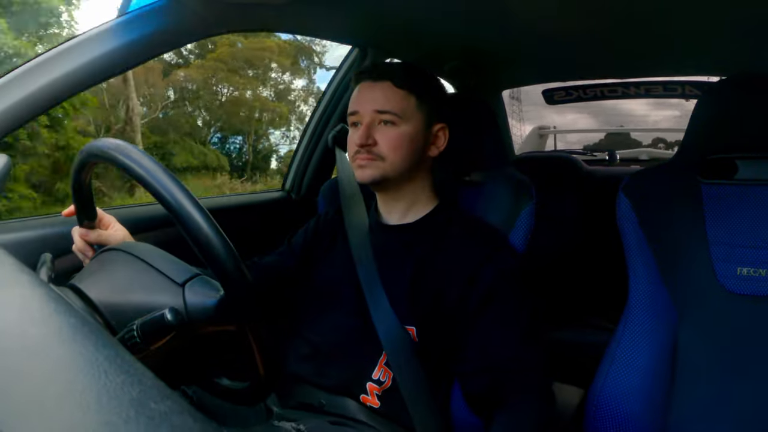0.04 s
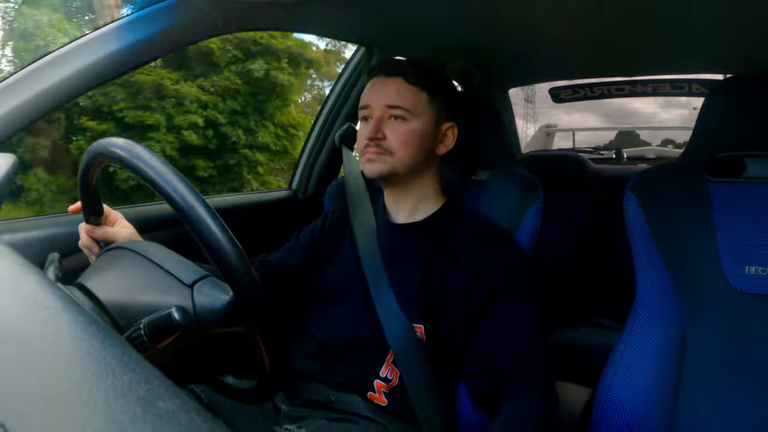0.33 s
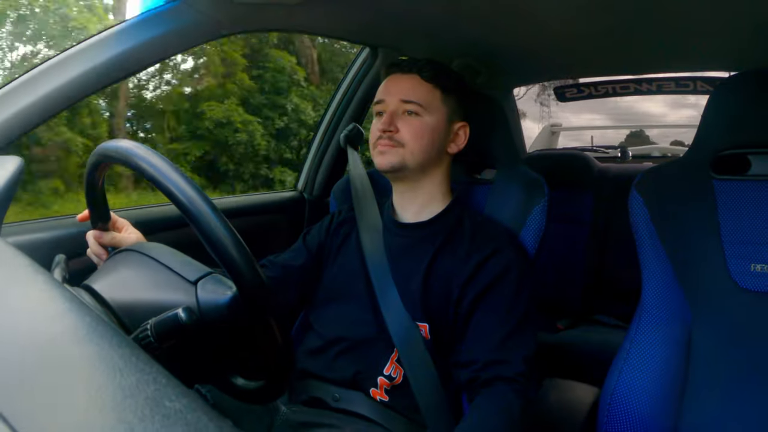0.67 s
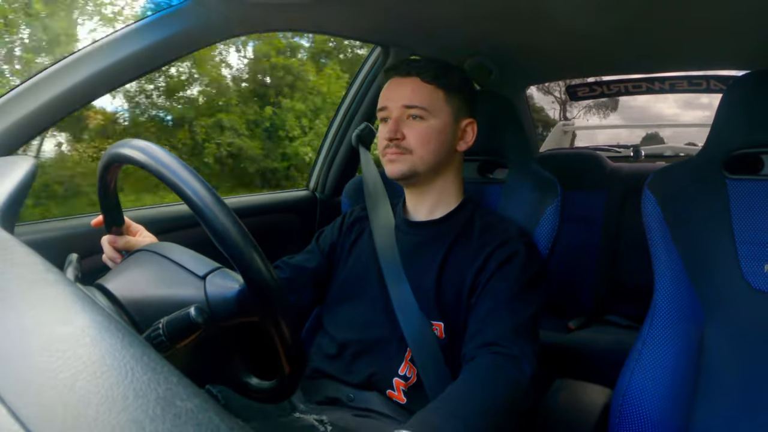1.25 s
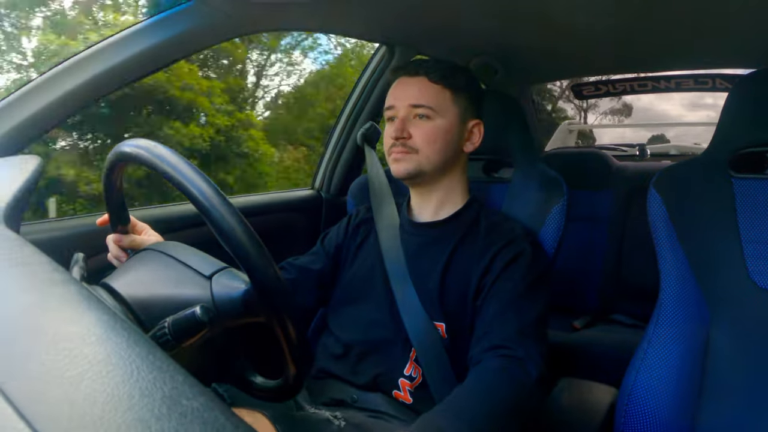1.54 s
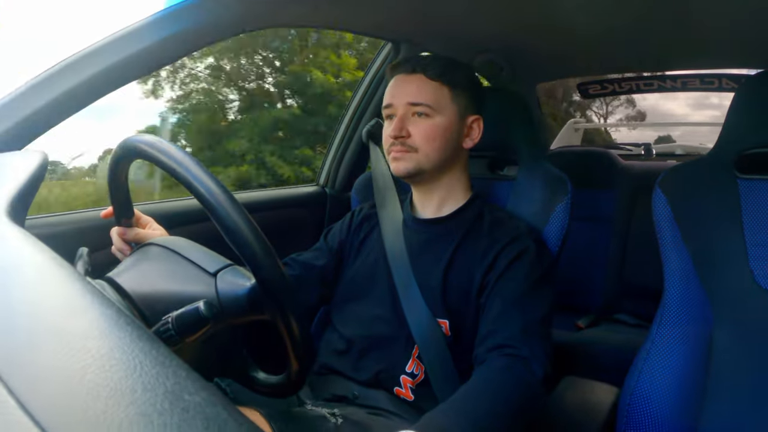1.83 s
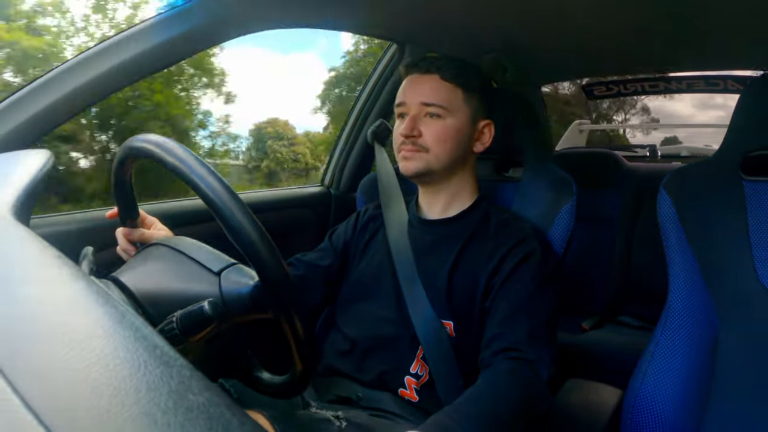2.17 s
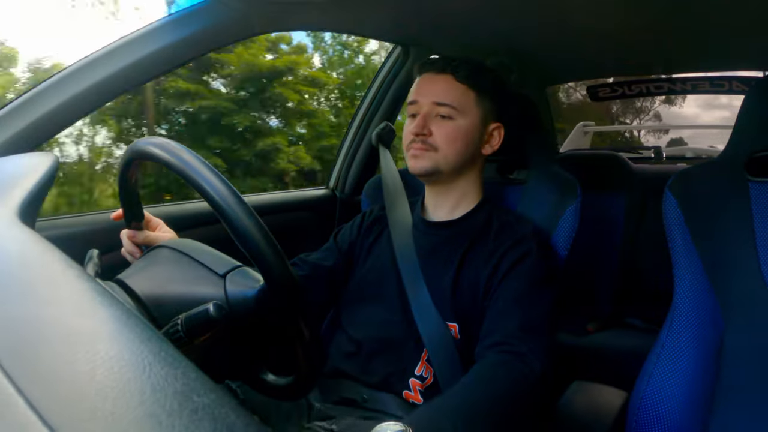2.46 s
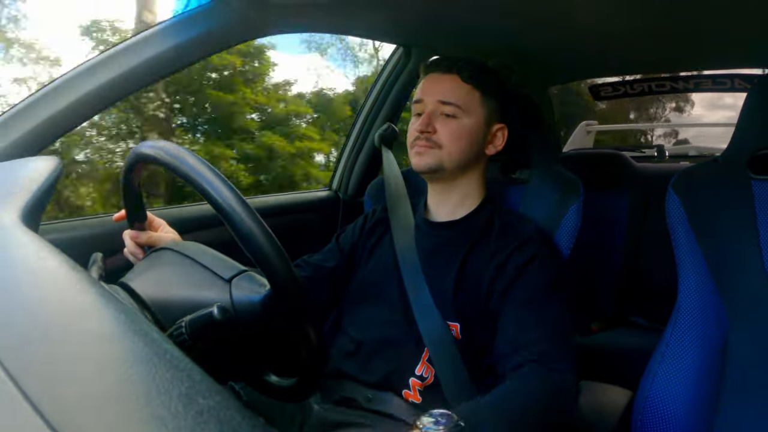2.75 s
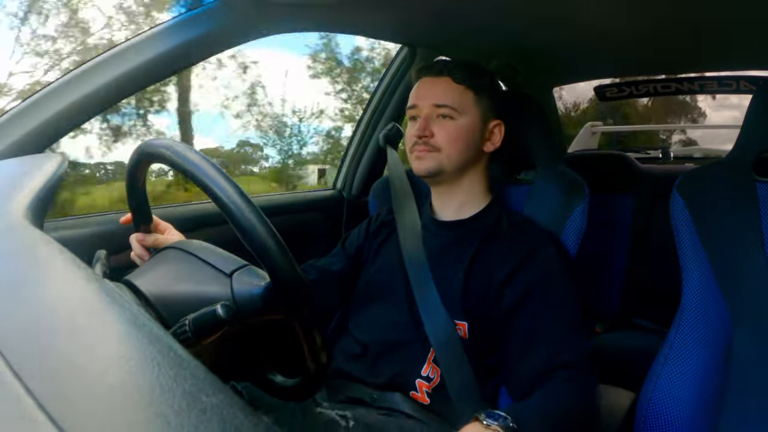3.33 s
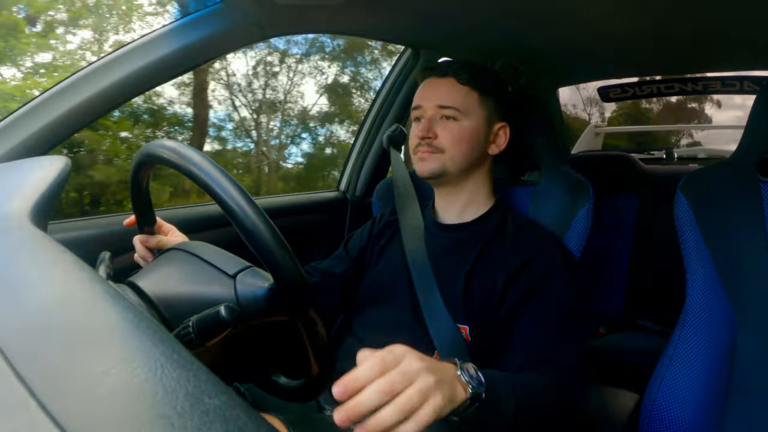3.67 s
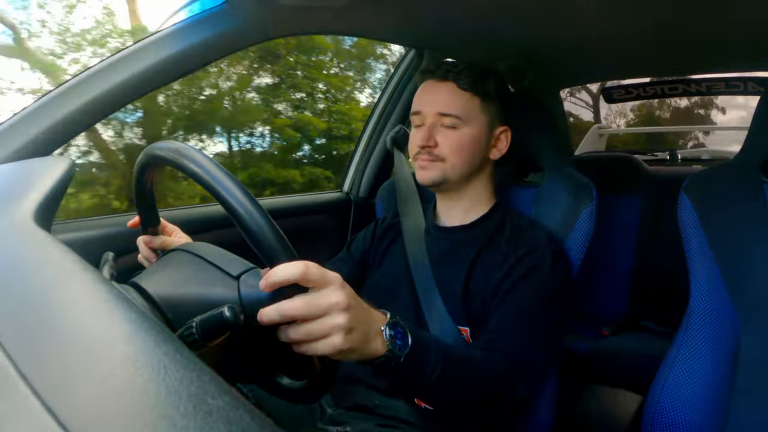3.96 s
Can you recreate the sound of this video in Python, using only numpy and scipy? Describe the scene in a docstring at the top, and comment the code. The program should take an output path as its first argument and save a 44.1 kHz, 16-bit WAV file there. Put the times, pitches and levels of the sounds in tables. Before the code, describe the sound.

Turbocharged car engine heard from inside, accelerating and twice letting out fluttering, whistling chuffs.

```python
"""A deep exhaust boom over road rumble: inside a turbocharged four-cylinder car that is speeding up.
The boom follows the firing of the cylinders, and the air intake hisses in time with them as the turbo
builds pressure. Twice the driver lifts off the throttle and the turbo's compressor surges (air flows
backwards through it): the intake pipe honks, then the air flutters out in quickening, whistling chuffs."""
import sys
import numpy as np
from scipy import signal
from scipy.fft import rfft, irfft, next_fast_len
from scipy.io import wavfile
from scipy.ndimage import uniform_filter1d, minimum_filter1d, map_coordinates

SR = 44100
rng = np.random.default_rng(int(sys.argv[2]) if len(sys.argv) > 2 else 0)


def wrap_up_sound(samples):
    """Save the sound to the file named by the first command line argument, as 16-bit audio."""
    columns = np.atleast_2d(samples).T
    # keep every value between -1 and 1, then stretch to whole-number steps
    tamed = np.clip(columns, -1, 1)
    steps = np.round(tamed * 32767).astype(np.int16)
    wavfile.write(sys.argv[1], SR, steps)


N = 176400  # 4 seconds

# Fixed pitches at which the cabin colours the hiss and chuffs: pitch_hz, width_hz, lift_db
CABIN_RESONANCES = [(1515, 34, 12.5), (1929, 61, 9), (2216, 180, 5.5), (2760, 110, 5), (3414, 120, 4.5),
                    (3910, 130, 4.5), (5070, 170, 4.5), (5970, 250, 4), (7890, 610, 5), (9970, 680, 2)]
# Puffs of escaping air: middle_s, length_s, level_db, whistle_hz, whistle_db, octave_db
CHUFFS = [(0.477, 0.034, -37, 7900, -62, -65), (0.55, 0.09, -36, 7750, -47, -48),
          (0.657, 0.058, -36, 7100, -43, -45), (0.739, .056, -36, 6340, -44, -47),
          (0.823, 0.047, -37.5, 5850, -41, -45), (0.903, .046, -36, 6000, -45, -56),
          (.976, 0.042, -37.5, 5700, -50, -56), (1.048, 0.037, -38, 5500, -52, -57),
          (1.12, 0.018, -37.5, 5300, -52, -60), (2.588, 0.076, -40, 8000, -50, -38),
          (2.69, 0.089, -37, 7520, -62, -50), (2.791, 0.07, -36, 7150, -42, -44),
          (2.883, 0.057, -36.5, 6530, -53, -41), (2.968, .052, -37, 5950, -46, -45),
          (3.052, 0.046, -37, 6097, -49, -50), (3.127, 0.043, -38, 5890, -50, -51),
          (3.199, 0.029, -37, 5410, -47, -60)]
CHUFF_EDGE_S = .018
# The honk's tone colour (how strong each pitch is): pitch_hz, level_db
HONK_COLOUR = [(600, -3), (1080, -18.5), (1200, 5), (1300, 7), (1400, -5.5), (1520, -9), (1700, -53),
               (3000, -42)]


def exhaust(firing_hz, phase):
    """The firing cylinders make a boom and two overtones; being unequal, they also burble."""
    # Strength of the boom: time_s, level_db
    boom_levels = [(0, -15), (.34, -10), (.41, -18.5), (.47, -15.5), (.97, -14.5), (1.06, -26), (1.12, -15),
                   (1.7, -14.5), (2.3, -10), (2.5, -12), (2.525, -27), (2.58, -16), (2.72, -18), (2.8, -14),
                   (3.02, -16.5), (3.1, -23), (3.18, -18), (4, -15.5)]
    # How hard the engine works: time_s, level_db
    engine_load = [(0, -5.5), (.35, 2.5), (.46, -17.5), (1, -13), (1.22, -0.5), (2, 0.5), (2.47, -2),
                   (2.56, -29), (3.05, -15), (3.3, -3.5), (4, 1.5)]
    # Cabin resonances met by the overtone at twice the firing rate: pitch_hz, level_db
    cabin_second = [(195, -18), (204, -14.5), (211, -20.5), (220, -28.5), (229, -33.5), (245, -32),
                    (262, -30), (270, -23.5), (280, -18), (290, -30.5)]
    # The same at three times the firing rate: pitch_hz, level_db
    cabin_third = [(300, -33), (332, -33.5), (347, -25), (363, -23.5), (378, -29), (392, -42.5), (435, -35)]
    # Strength of each burble tone: pitch_hz, level_db
    burble_colour = [(30, -71), (55, -26), (78, -34), (100, -42.5), (135, -39), (170, -34), (205, -29.5),
                     (250, -45), (310, -38.5), (350, -28.5), (385, -36), (425, -35), (470, -51.5),
                     (600, -52.5), (900, -53.5)]
    load = amp(curves(engine_load)[0])
    out = amp(curves(boom_levels)[0] + .6 * wobble(21.38)) * np.cos(phase)
    for k, cabin in enumerate((cabin_second, cabin_third), 2):
        level_db = along(cabin, k * firing_hz) + wobble(16)
        out += load * amp(level_db) * np.cos(k * phase + .14 * wobble(25))
    rasp_db = 3.5 * np.log2(firing_hz / firing_hz.mean())  # the upper burble grows with engine speed
    for quarters in range(1, 21):  # burble tones lie at quarter steps of the firing rate
        if quarters not in (4, 8, 12):  # skip the boom and its overtones
            multiple = quarters / 4
            level_db = along(burble_colour, multiple * firing_hz) + 2.2 * wobble(6)
            level_db += rasp_db * (multiple > 2) - 4 * (quarters % 2)  # odd quarters are weaker
            drift = rng.standard_normal() + .44 * wobble(15)
            out += load * amp(level_db) * np.cos(multiple * phase + drift)
    return -np.sqrt(2) * out


def intake(phase):
    """Air hisses in, one gulp for each cylinder; high turbo pressure smooths the flow."""
    # The hiss and how strongly it pulses: time_s, level_db, pulsing (0 = steady)
    hiss_levels = [(0, -38, 0.1), (.35, -34.5, 0.2), (.5, -38.5, .05), (.7, -39.5, 0.03), (.9, -46, 0.03),
                   (1.19, -46.5, 0.64), (1.27, -42.5, 0.68), (1.6, -38.5, 0.47), (1.95, -38, 0.29),
                   (2.2, -37.5, .05), (2.5, -36, 0), (2.7, -38, 0.15), (3, -42.5, 0.02), (3.27, -46, 0.37),
                   (3.34, -43.5, .65), (3.55, -42.5, .6), (3.75, -40, .45), (4, -37.5, .4)]
    # Tone colour of the hiss: pitch_hz, level_db
    hiss_colour = [(600, 5.5), (1500, 3), (2500, 0), (4000, 1.5), (6000, 0), (8000, -5), (10000, -4),
                   (13000, -9.5), (16000, -10)]
    level_db, pulsing = curves(hiss_levels)
    depth = np.clip(1.42 * pulsing, 0, .95)
    gulps = np.sqrt(1 + depth * np.cos(phase))
    return amp(level_db) * gulps * noise(hiss_colour, CABIN_RESONANCES)


def compressor():
    """A whoosh climbs as the turbo spins up, over a broad hiss of squeezed air."""
    # Path of the whoosh: time_s, level_db, pitch_hz
    whoosh_path = [(0, -47, 7560), (.35, -44.5, 9150), (.6, -58, 8000), (1.3, -61, 6004), (1.8, -46, 7660),
                   (2.1, -41, 9100), (2.35, -39, 10000), (2.52, -42, 10000), (2.75, -56, 8500),
                   (3.5, -78, 6000), (4, -60, 7507)]
    # Tone colour of the squeezed air: pitch_hz, level_db
    hiss_colour = [(3000, -10), (5000, -1), (7500, 1), (9000, -3), (12000, -1), (16000, -9)]
    level_db, pitch_hz = curves(whoosh_path)
    # Cut noise into short slices and keep a narrow band around the moving pitch.
    hz, slice_s, slices = signal.stft(rng.standard_normal(N), SR, nperseg=256)
    octaves_away = np.log2((hz[:, None] + 1) / np.interp(slice_s, np.arange(N) / SR, pitch_hz))
    whoosh = signal.istft(slices / (1 + (octaves_away / .17) ** 2), SR, nperseg=256)[1][:N]
    hiss = noise(hiss_colour, CABIN_RESONANCES)
    return amp(level_db) * (amp(-3) * unit(whoosh) + amp(2) * hiss)


def flutter():
    """Trapped air escapes backwards in chuffs; the strong ones spray more treble."""
    # Tone colour of a chuff: pitch_hz, level_db
    chuff_colour = [(800, 7), (1550, -2.5), (1900, -1), (2200, -6), (2800, -11), (4200, -5), (5500, -1.5),
                    (7000, 1), (8000, -1.5), (10000, 0.5), (13000, -8), (16000, -15)]
    # Tone colour of its high spray: pitch_hz, level_db
    spray_colour = [(5000, -31), (9000, -4), (12000, 1.5), (13500, 5), (16000, -3.5)]
    flow = sum(amp(db) * puff(s, length, CHUFF_EDGE_S) for s, length, db, *_ in CHUFFS)
    spray_flow = flow.max() * (flow / flow.max()) ** 1.4
    chuffs = amp(-2.5) * flow * noise(chuff_colour, CABIN_RESONANCES)
    spray = amp(-9) * spray_flow * noise(spray_colour)
    honk = amp(-6.5) * flow * noise(HONK_COLOUR)
    return chuffs + spray + honk


def honks():
    """The first surges ring the intake pipe, gulp and chirp; the ring dies away slowly."""
    # Honks of the stalling compressor: middle_s, length_s, ring_db, gulp_db
    surges = [(0.373, 0.053, -37, -30), (0.456, 0.061, -33, -30), (0.56, 0.05, -38, -34),
              (0.623, .04, -54, -30.5), (2.507, .04, -26, -30.5), (2.589, 0.074, -29.5, -35),
              (2.697, .06, -34.5, -34.5)]
    # Ringing left in the pipe after each throttle lift: start_s, level_db
    lifts = [(.36, -39.5), (2.48, -38)]
    # Brief hoots in the escaping air: middle_s, length_s, pitch_hz, level_db
    hoots = [(.47, .02, 745, -33), (.603, .011, 2850, -35), (.657, .011, 2680, -38)]
    # Tone colour of the low gulp: pitch_hz, level_db
    gulp_colour = [(350, -3), (480, -9), (560, 2), (640, -9.5), (730, 5.5), (820, -13.5), (900, 0),
                   (1100, -8.5), (2500, -22.5), (5000, -45.5)]
    # How alike the honk is in both ears: pitch_hz, likeness (1 = the same)
    likeness = [(500, 0.94), (800, 0.24), (1250, -0.056), (2000, 1)]
    edge_s, fade_db_per_s = .045, 15
    t = np.arange(N) / SR
    ring = sum(amp(db) * puff(s, length, edge_s) for s, length, db, _ in surges)
    linger = sum(amp(db - fade_db_per_s * np.abs(t - s)) * np.clip((t - s) / edge_s, 0, 1)
                 for s, db in lifts)
    gulp = sum(amp(db) * puff(s, length, edge_s) for s, length, _, db in surges)
    chirps = sum(amp(db) * puff(s, length, .011) * np.sin(2 * np.pi * hz * t + .68 * wobble(240))
                 for s, length, hz, db in hoots)
    honk = np.hypot(ring, linger) * noise(HONK_COLOUR, likeness=likeness)
    honk += gulp * noise(gulp_colour, likeness=likeness)
    return honk * lean_left(db=2) + chirps


def whistle():
    """Each chuff carries an airy whistle and its octave, sinking as the turbo slows."""
    sag_octaves_per_s = 1.0
    out = np.zeros(N)
    # Fast random wobbles blur each pure tone into a breathy one.
    breath = np.array([wobble(600 * k) + 1j * wobble(600 * k) for k in (1, 2)])
    for s, length, _, hz, *levels in CHUFFS:
        i = np.arange(int((s - length / 2) * SR), int((s + length / 2) * SR))
        pitch_hz = hz * 2 ** (-sag_octaves_per_s * (i / SR - s))
        phase = 2 * np.pi * np.cumsum(pitch_hz) / SR
        swell = np.sqrt(np.hanning(len(i)))
        for k, db in enumerate(levels, 1):
            out[i] += amp(db) * swell * np.real(breath[k - 1, i] * np.exp(1j * k * phase))
    return out


def pipe_note():
    """Every chuff, weak or strong, blows the same thin note in the pipe."""
    # Tone colour of the note: pitch_hz, level_db
    note_colour = [(1500, -46), (1780, -12), (1890, 10), (2020, -36), (2400, -14)]
    blowing = sum(puff(s, length, CHUFF_EDGE_S) for s, length, *_ in CHUFFS)
    return amp(-44.5) * blowing * noise(note_colour)


def road():
    """The car's body rumbles while the tyres and engine bay roar."""
    # Strength of the rumble and of the roar: time_s, level_db
    rumble_levels = [(0, -22), (.3, -22.5), (.45, -19), (1, -19), (1.3, -18.5), (1.5, -18.5), (1.9, -19),
                     (2.05, -24), (2.3, -28), (2.48, -19.5), (2.57, -18), (2.74, -18), (2.85, -22),
                     (3, -18), (3.4, -16), (4, -20)]
    roar_levels = [(0, -29), (1, -30.5), (1.4, -29.5), (2, -25.5), (2.45, -28.5), (2.8, -29), (3.2, -29.5),
                   (4, -26)]
    # Their tone colours: pitch_hz, level_db
    rumble_colour = [(12, 6), (22, -14.5), (32, 4), (45, -2), (60, 0), (80, -7), (115, -4.5), (160, -10.5),
                     (300, -38), (600, -107)]
    roar_colour = [(60, -14), (150, -2), (205, 4.5), (280, -1.5), (400, -4.5), (500, -9), (560, -10.5),
                   (640, -13.5), (750, -17.5), (980, -14.5), (1200, -20.5), (1800, -25), (3000, -33.5),
                   (8000, -56), (15000, -49)]
    rumble = amp(curves(rumble_levels)[0]) * noise(rumble_colour)
    roar = amp(curves(roar_levels)[0]) * noise(roar_colour)
    return rumble + roar


def noise(colour, resonances=(), likeness=None):
    """Stereo noise of strength 1 with a tone colour and optional boosted pitches."""
    # How alike cabin noise is in both ears: pitch_hz, likeness (1 = the same)
    cabin_likeness = [(50, 0.96), (150, 0.94), (300, 0.89), (550, 0.64), (1200, 0.45), (2000, 0.68),
                      (4000, .96), (6500, 1)]

    def response(hz):
        """Gains for the part both ears share (mid) and the part they hear opposite (side)."""
        lift_db = sum(db / (1 + (2 * (hz - centre) / width) ** 2) for centre, width, db in resonances)
        spread = np.arccos(np.clip(along(likeness or cabin_likeness, hz), -1, 1)) / 2
        return amp(along(colour, hz) + lift_db) * [np.cos(spread), np.sin(spread)]
    mid, side = filtered(rng.standard_normal((2, N)), response)
    return unit(np.array([mid + side, mid - side]))


def puff(middle_s, length_s, edge_s):
    """A level that rises softly, holds and falls softly."""
    out = np.zeros(N)
    first, last = int((middle_s - length_s - edge_s) * SR), int((middle_s + length_s + edge_s) * SR)
    i = np.arange(max(0, first), min(N, last))
    ramp = np.clip((length_s / 2 - np.abs(i / SR - middle_s)) / edge_s + .5, 0, 1)
    out[i] = np.sin(np.pi * ramp / 2) ** 2
    return out


def wobble(rate):
    """A smooth curve through `rate` random values a second."""
    steps = np.arange(0, N * rate / SR + 1, 1 / 6)
    values = rng.standard_normal(size=8192)[:int(steps[-1]) + 2]
    curve = map_coordinates(values, [steps], mode="mirror")
    return np.interp(np.arange(N) * (rate / SR), steps, curve)


def amp(db):
    """Turn decibels into a gain to multiply by."""
    return np.exp(np.asarray(db) * (np.log(10) / 20))


def lean_left(db):
    """Left and right gains that make the left side louder by db."""
    return amp(db * np.array([[.5], [-.5]]))


def unit(x):
    """Scale to an average strength (rms) of 1."""
    return x / np.sqrt(np.mean(x ** 2) + 1e-20)


def along(points, hz):
    """Read a table of pitch_hz, value at any pitch, with octaves evenly spaced."""
    pitches, values = np.transpose(points)
    return np.interp(np.log(hz + 1), np.log(pitches + 1), values)


def curves(rows):
    """One value per sample for each column after the time."""
    times, *columns = np.transpose(rows)
    return [np.interp(np.arange(N) / SR, times, column) for column in columns]


def filtered(x, response):
    """Turn each frequency in x up or down by the gain response(hz)."""
    size = next_fast_len(N + 8192)
    return irfft(rfft(x, size) * response(np.fft.rfftfreq(size, 1 / SR)), size)[..., :N]


def scene():
    """Engine speed drives exhaust and intake; everything meets in the cabin."""
    # How often the cylinders fire: time_s, firing_hz
    engine_speed = [(0, 132.3), (.08, 139.3), (.29, 144.5), (.39, 144.7), (.48, 135.8), (.75, 118.4),
                    (1.03, 103.4), (1.17, 110.8), (1.28, 107.7), (1.65, 114.9), (2, 123.1), (2.3, 129.5),
                    (2.49, 132.9), (2.62, 121.5), (3.13, 94.26), (3.27, 101.9), (3.37, 99.67), (4, 106.2)]
    firing_hz, = curves(engine_speed)
    jitter = 1 + .003 * wobble(24.9)
    phase = 2 * np.pi * np.cumsum(firing_hz * jitter) / SR
    engine = exhaust(firing_hz, phase) + intake(phase)
    turbo = compressor() + flutter() + pipe_note() + whistle() + honks()
    return engine + turbo + road()


def record(dry):
    """The left microphone hears a little more; a limiter holds the peaks; the highest treble is cut."""
    # How much louder the left side is: pitch_hz, level_db
    balance = [(60, 1.3), (130, 1.2), (350, 1.2), (640, 2), (1200, 3), (2400, 1), (5000, 0)]
    ceiling, hold_samples, top_hz = .6, int(.01 * SR), 15780
    heard = filtered(dry, lambda hz: lean_left(along(balance, hz)))
    needed_gain = np.minimum(1, ceiling / (np.abs(heard).max(axis=0) + 1e-9))
    smooth_gain = uniform_filter1d(minimum_filter1d(needed_gain, hold_samples), hold_samples)
    return filtered(heard * smooth_gain, lambda hz: hz < top_hz)


dry = scene()
out = record(dry)
wrap_up_sound(out)
```